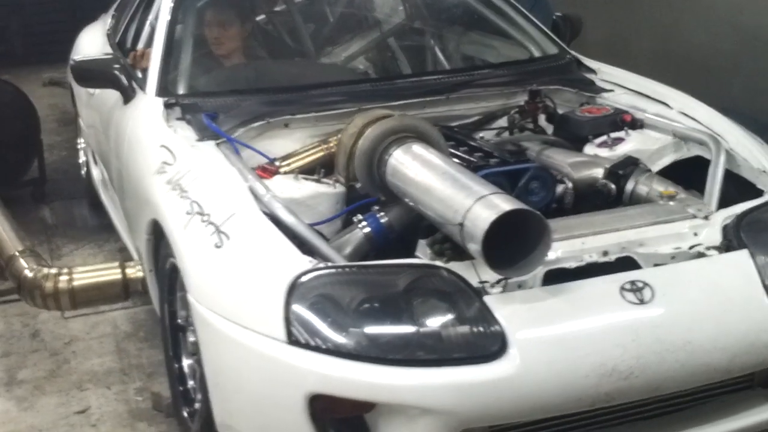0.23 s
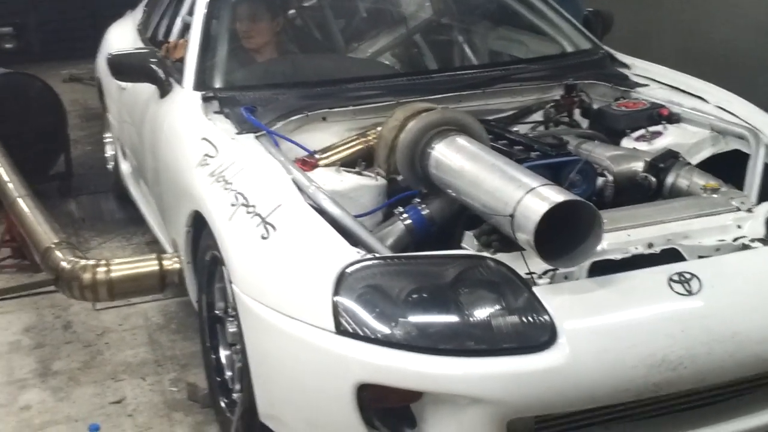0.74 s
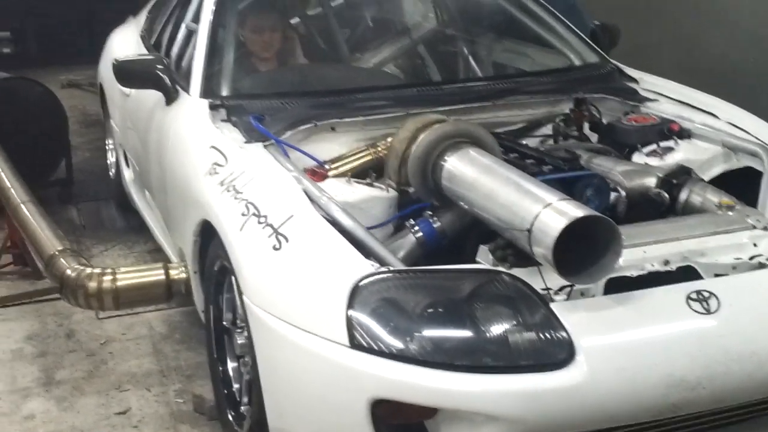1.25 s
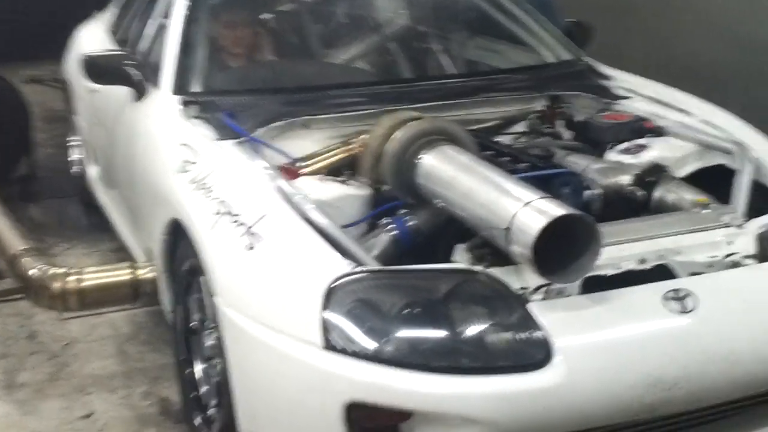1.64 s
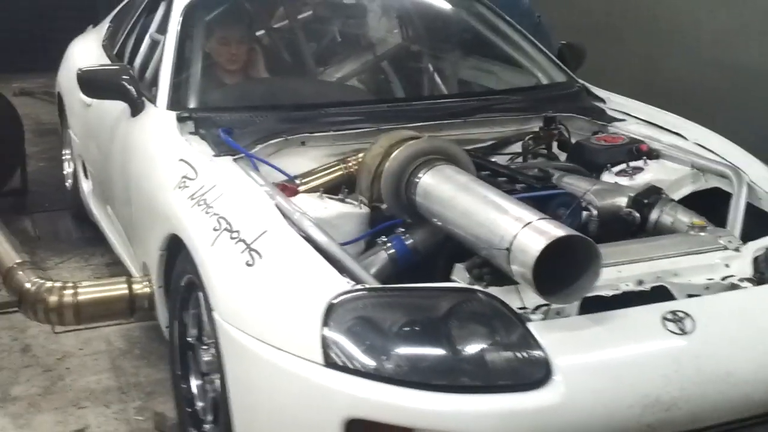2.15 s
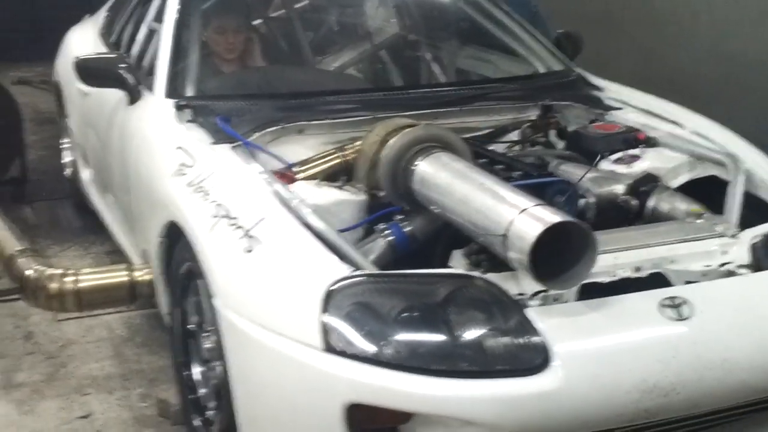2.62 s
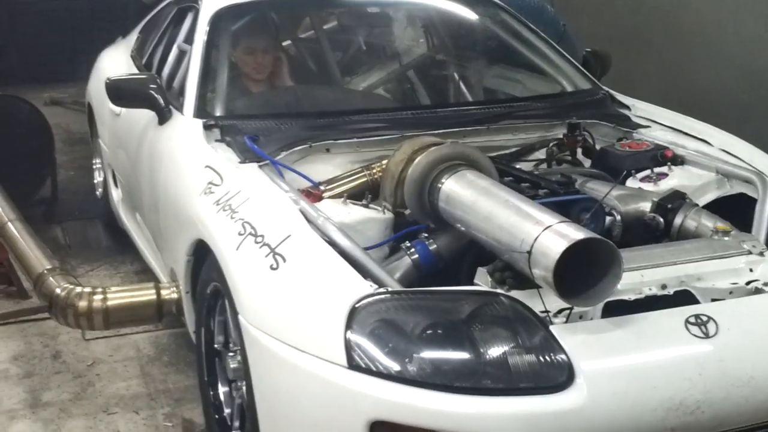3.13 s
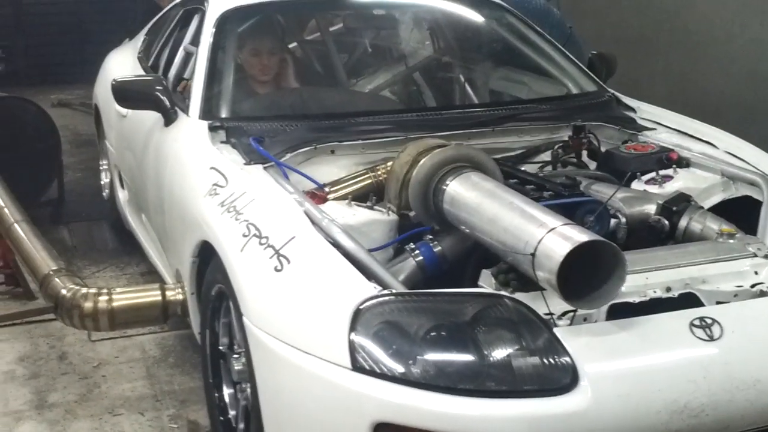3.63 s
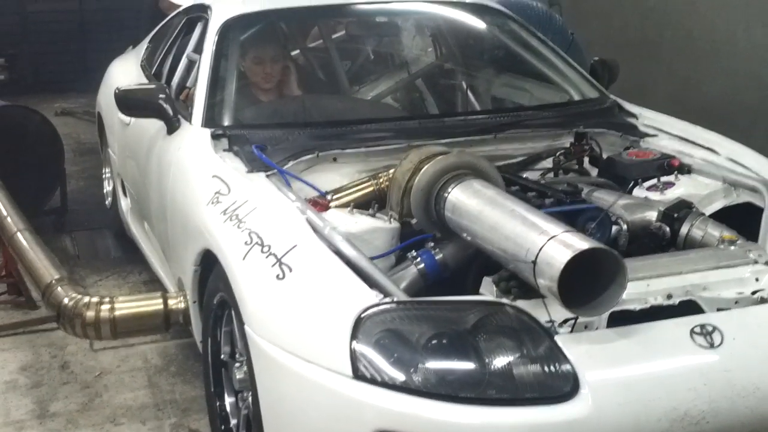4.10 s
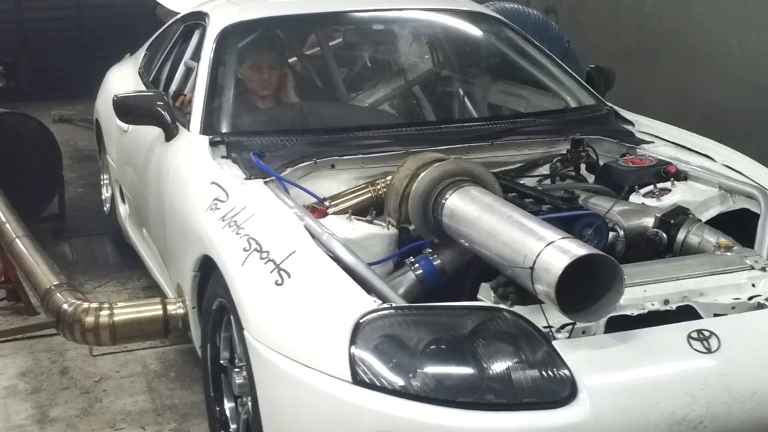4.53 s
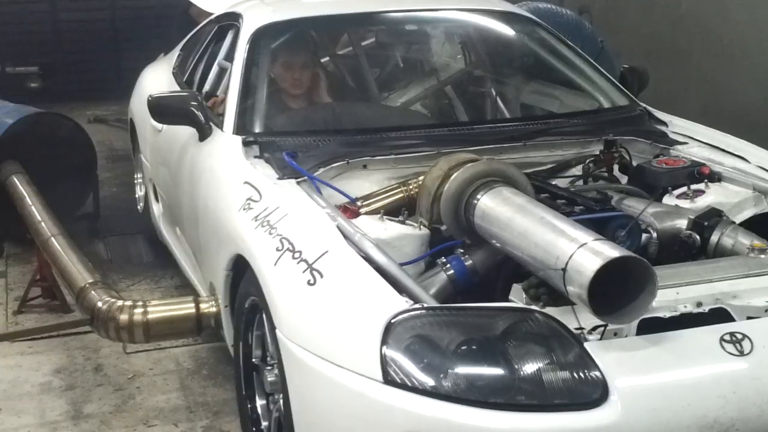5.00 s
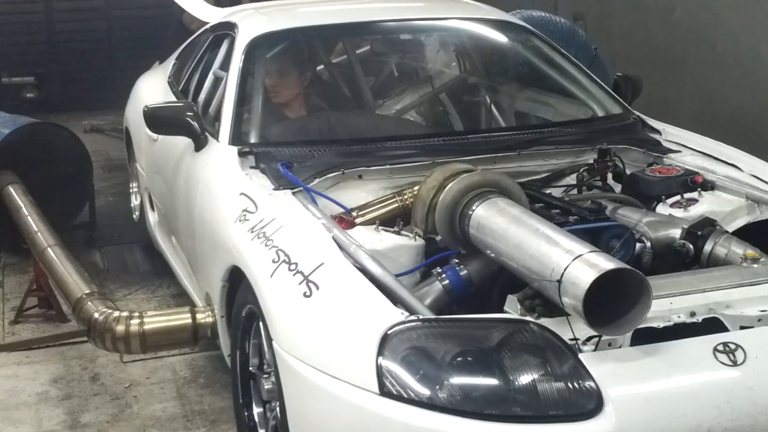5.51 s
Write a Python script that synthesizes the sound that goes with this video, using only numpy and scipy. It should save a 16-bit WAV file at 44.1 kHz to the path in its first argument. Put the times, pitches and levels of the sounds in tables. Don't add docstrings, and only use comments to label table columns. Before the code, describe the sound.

Indoors, a turbocharged six-cylinder engine pulls under load, very close to a small overloaded stereo microphone. A blurred turbo whistle climbs over rushing intake air, rough roar and an early exhaust drone. It holds as a piercing high scream, then at about five seconds the throttle shuts and the pitch drops through quick chirps and flutters amid hissing vented air.

```python
import sys
import numpy as np
from scipy import signal
from scipy.fft import rfft, irfft, next_fast_len
from scipy.io import wavfile
from scipy.ndimage import uniform_filter1d, map_coordinates

SR = 44100
rng = np.random.default_rng(int(sys.argv[2]) if len(sys.argv) > 2 else 0)


def store_pcm(level_fs):
    pcm = np.round(np.clip(level_fs, -1, 1) * 32767).astype(np.int16)
    wavfile.write(sys.argv[1], SR, np.atleast_2d(pcm).T)


def boost(x):
    u = np.asarray(x, float) / 20
    return 10 ** u


N = 254016
T = np.arange(N) / SR
LIFT_S = 5.07
SURGE_PAUSE = 0.13

# [time_s, blade_hz, tone_db]
SPOOL = [(0, 1871, -8.5), (.6, 2637, -8), (1.0, 3121, -6), (1.3, 3675, -2), (1.78, 4620, 1),
         (1.94, 5020, -9), (2.03, 5258, 2), (2.36, 6130, -3.5), (2.6, 7013, 5.5), (2.96, 8370, 7.5),
         (3.55, 8910, 5.5), (4.1, 9070, 7.5), (4.75, 9110, 7.5), (5.07, 8904, 3.5), (5.25, 8480, 3),
         (5.36, 7545, -2), (5.6, 5960, 4.5), (5.76, 5430, 0)]
# [blade_hz, width_hz]
TONE_WIDTH = [(2200, 330), (2700, 150), (4500, 155), (5300, 220), (7000, 280), (7800, 380), (8800, 400),
              (9120, 350)]
# [blade_hz, core_db]
TONE_CORE = [(2300, -23), (2700, -13), (3300, -13), (4600, -4.5), (5000, -26), (7600, -4.5), (8300, -18.5)]
# [blade_hz, share_of_pitch, level_db]
STALL = [(1900, 0.84, -15), (3000, .76, -12), (3890, .84, -7), (4314, .83, -14), (4800, 0.921, -4.5),
         (5946, .9, -13), (7350, .93, -40)]
# [blade_hz, octave_db]
OCTAVE = [(4500, -30), (4950, -21), (5200, -9), (5900, -12), (7000, -6), (9000, -5.5)]


def compressor():
    wheel_hz, tone_db = curves(SPOOL)
    surge_db, jump_hz = surges()
    closed = shut()
    width = along(TONE_WIDTH, wheel_hz) * 0.5 ** closed
    hz = wheel_hz + jump_hz + 0.12 * width * wobble(7)

    core_db = np.interp(hz, *np.transpose(TONE_CORE)) + 8 * closed
    tone_db = tone_db - 15.5 * closed + surge_db
    tone = narrow(hz, 0.53 * width, shared=0.17, core_db=core_db)
    tone = boost(tone_db + 0.27 * wobble(22)) * tone

    stall_hz, share, level_db = np.transpose(STALL)
    stall_share = np.interp(wheel_hz, stall_hz, share)
    stall_db = np.interp(wheel_hz, stall_hz, level_db)
    stall = boost(stall_db) * narrow(stall_share * hz, 180, shared=0.069, core_db=-13)

    octave = narrow(2 * hz, 1.3 * width, shared=0.1, core_db=-20)
    octave = boost(along(OCTAVE, wheel_hz)) * octave
    return tone + boost(-30 * closed) * (stall + octave)


# [peak_s, length_s, rise_db, jump_hz]
SURGES = [
    (5.21, .024, 12, -30),
    (5.3, .008, 11, 253),
    (5.36, 0.034, 15, -1),
    (5.485, .022, 5, 781.5),
    (5.681, .09, 9, 81.5),
]


def surges():
    peak_s, length_s, rise_db, jump_hz = np.transpose(SURGES)[..., None]
    surge = np.exp(-((T - peak_s) / length_s) ** 2)
    jump = jump_hz * np.minimum(1, 2 * surge)
    return (rise_db * surge).sum(axis=0), jump.sum(axis=0)


def shut():
    return np.clip((T - LIFT_S) / 0.04578, 0, 1)


def bypass():
    level_db = -23 + 11 * (T - LIFT_S) - 35 * (1 - shut())
    level_db = level_db - 2 * SURGE_PAUSE * surges()[0]
    return boost(level_db) * narrow(np.full(N, 4940), 110, shared=0.1, core_db=-27)


# [blade_hz, rush_db]
INTAKE = [(1900, -1.5), (4100, 1), (5200, -1.5), (8300, 0), (8950, -2)]
# [freq_hz, level_db]
RUSH_COLOR = [(300, -8.5), (1000, -11.5), (2500, -3.5), (5000, 4), (8000, -0.5), (12000, -3.5),
              (16000, -15), (22000, -43)]


def intake():
    open_db = along(INTAKE, curves(SPOOL)[0])
    vented_db = 1.5 - SURGE_PAUSE * surges()[0]
    refill = np.clip((T - LIFT_S) / 0.16, 0, 1)
    rush_db = open_db + (vented_db - open_db) * refill
    return boost(rush_db + 0.48 * wobble(6)) * turbulence(RUSH_COLOR, [(1000, 0)], patchy_db=1.14)


# [time_s, roar_db]
EFFORT = [(0, -7), (.6, -0.5), (.9, -4), (1.6, -3.5), (2.0, -6), (2.3, -10), (2.7, -4.5), (3.4, -2),
          (4.8, -4.5), (5.06, -3.5)]
# [freq_hz, level_db]
ROAR_COLOR = [(150, -6), (300, -11), (600, -5.5), (1000, -1.5), (1600, -0.5), (2300, -1), (4000, -2.5),
              (8000, -21)]
# [freq_hz, left_right_likeness]
ROAR_ALIKE = [(100, 0.35), (200, 0.0042), (320, -0.64), (600, -0.28), (1200, -0.02)]


def engine_roar():
    (effort_db,) = curves(EFFORT)
    coast_db = -7.5 - SURGE_PAUSE * surges()[0]
    roar_db = effort_db + (coast_db - effort_db) * shut()
    return boost(roar_db + 1.1 * wobble(8)) * turbulence(ROAR_COLOR, ROAR_ALIKE, patchy_db=0.5)


ORDERS = [6, 7, 8, 9, 10, 11, 12, 14, 15, 18, 20, 22, 24, 28, 30]
ORDERS_DB = [-5, -8, -15, 0, -8, -15, -1, -11, -11, -4, -13, -12, -4, -8, -11]
# [center_hz, half_width_hz, lift_db]
PIPE = [(328, 22, 11), (368, 15, -11)]


def exhaust():
    crank_hz = 33.8 + 2.6 * T + 0.95 * T ** 2
    angle = 2 * np.pi * np.cumsum(crank_hz) / SR
    drone_db = -19 - 4.5 * T - 22 * np.maximum(T - 2.503, 0)
    boom_db = 7 / (1 + np.exp((T - 0.21) / 0.0098))
    lag = np.array([[0], [2.55]])
    drone = np.zeros((2, N))
    for multiple, order_db in zip(ORDERS, ORDERS_DB):
        pipe_db = boom_db * ((multiple == 10) - (multiple == 9))
        for center_hz, half_width, lift_db in PIPE:
            pipe_db = pipe_db + lift_db / (1 + ((multiple * crank_hz - center_hz) / half_width) ** 2)
        phase = multiple * angle + 0.5 * wobble(12) + rng.uniform(0, 2 * np.pi)
        drone += boost(order_db + pipe_db + 2.0 * wobble(8.12)) * np.sin(phase - lag)
    return boost(drone_db) * drone


# [time_s, level_db, channel]
PUFFS = [
    (.116, -3, 0),
    (0.229, -8.5, 1),
    (0.261, -7, 0),
    (0.42, -7, 0),
    (0.444, -10.5, 0),
    (0.477, -10, 0),
    (0.58, -1, 0),
    (.85, -9, 0),
]


def puffs():
    out = np.zeros((2, N))
    for time_s, level_db, channel in PUFFS:
        out[round(channel)] += boost(level_db) * np.exp(-((T - time_s) / 0.0006) ** 2)
    return out


def narrow(hz, half_width, shared, core_db):
    drift = np.exp(1j * 1.61 * np.array([wobble(22), wobble(22)]))
    core = boost(core_db + 1.2 * wobble(30)) * np.exp(1j * 0.81 * wobble(45))
    own = np.array([blur(half_width), blur(half_width)])
    share = np.clip(shared, 0, 1)
    common = np.sqrt(share) * blur(half_width) + core
    envelope = common * drift + np.sqrt(1 - share) * own
    carrier = np.exp(2j * np.pi * np.cumsum(hz) / SR)
    return unit(np.real(envelope * carrier))


def blur(half_width):
    place = 16 * np.cumsum(np.broadcast_to(half_width, N)) / SR
    poles = [np.exp(-3 * np.pi / 16)] * 2
    knots = signal.lfilter([1], np.poly(poles), rng.standard_normal((2, 2 ** 15)))
    real, imag = (map_coordinates(k, [place], mode="wrap") for k in knots)
    return unit(real + 1j * imag)


def turbulence(color, alike, patchy_db):
    z = signal.stft(rng.standard_normal((2, N)), nperseg=512)[2]
    patches = uniform_filter1d(rng.standard_normal(z.shape[1:]), size=6, axis=0)
    patches = unit(uniform_filter1d(patches, size=10, axis=1))
    pair = signal.istft(z * boost(patchy_db * patches), nperseg=512)[1][:, :N]

    def mid_side(hz):
        turn = np.arccos(np.clip(along(alike, hz), -1, 1)) / 2
        return boost(along(color, hz)) * [np.cos(turn), np.sin(turn)]

    mid, side = filtered(pair, mid_side)
    return unit(np.array([mid + side, mid - side]))


def wobble(rate):
    place = np.cumsum(np.broadcast_to(rate, N)) / SR
    return unit(map_coordinates(rng.standard_normal(2 ** 14), [place], mode="wrap"))


def curves(rows):
    time_s, *columns = np.transpose(rows)
    return [np.interp(T, time_s, column) for column in columns]


def along(points, hz):
    point_hz, value = np.transpose(points)
    return np.interp(np.log(hz + 1), np.log(point_hz + 1), value)


def filtered(x, response):
    m = next_fast_len(N + 8192)
    return irfft(rfft(x, m) * response(np.fft.rfftfreq(m, 1 / SR)), m)[..., :N]


def unit(x):
    return x / np.sqrt(np.mean(np.abs(x) ** 2) + 1e-20)


def scene():
    return compressor() + bypass() + intake() + engine_roar() + exhaust()


# [freq_hz, level_db]
LEFT_PORT = [(200, 7), (1500, 0.5), (3000, -1.5), (5000, -6), (6000, -10.5), (6800, -3), (7600, -2),
             (9000, 1.25), (10300, 4.5), (11600, 9), (13000, 6), (14500, 14.5), (22000, 1.5)]
# [freq_hz, level_db]
RIGHT_PORT = [(200, 5), (1500, 1.5), (3000, -0.5), (4200, 0.5), (5000, 2), (5800, -2), (6800, -2),
              (7600, -1.5), (9000, -5), (11600, -5), (14500, 3.5), (22000, 7.5)]


def capsules(dry):
    return filtered(dry, lambda hz: boost([along(LEFT_PORT, hz), along(RIGHT_PORT, hz)]))


# [freq_hz, level_db]
AFTER_PREAMP = [(20, -23.5), (120, -29), (180, -22), (250, -5.5), (330, -1.5), (500, 1), (5800, 0),
                (6700, -4.5), (7600, -2), (9000, 1)]


def preamplifier(ported):
    driven = boost([[-7], [-6]]) * ported
    flattened = boost(3.2) * driven / (1 + np.abs(driven) ** 3.2) ** (1 / 1.257)
    return filtered(flattened, lambda hz: boost(along(AFTER_PREAMP, hz)))


def band_limit(x):
    return signal.sosfilt(signal.butter(12, 14420, fs=SR, output="sos"), x)


def record(dry):
    mix = preamplifier(capsules(dry)) + puffs()
    return band_limit(mix)


dry = scene()
out = record(dry)
store_pcm(out)
```